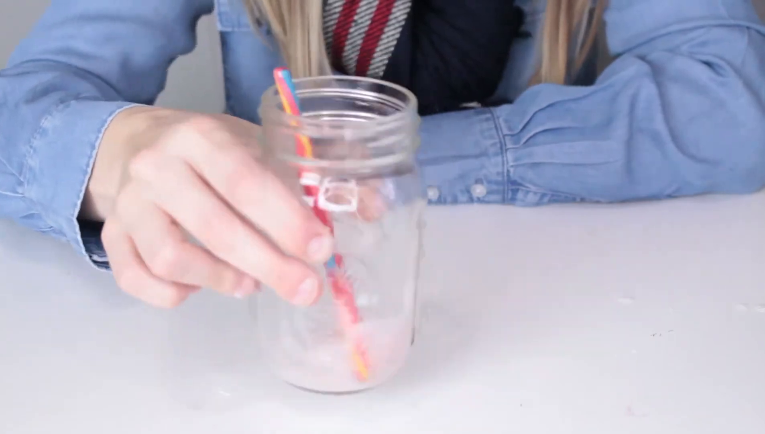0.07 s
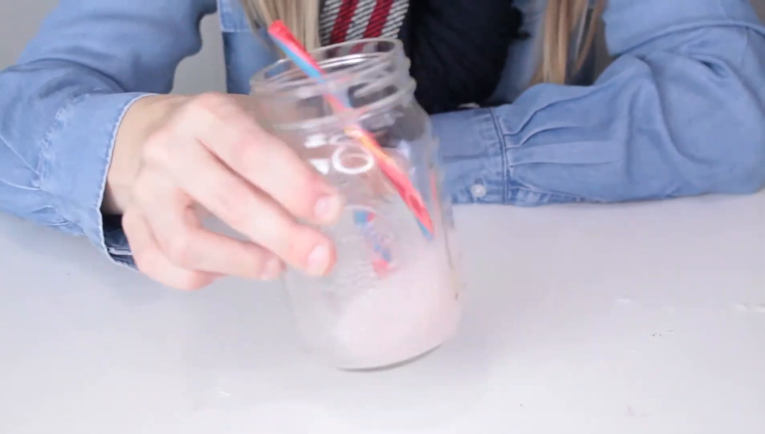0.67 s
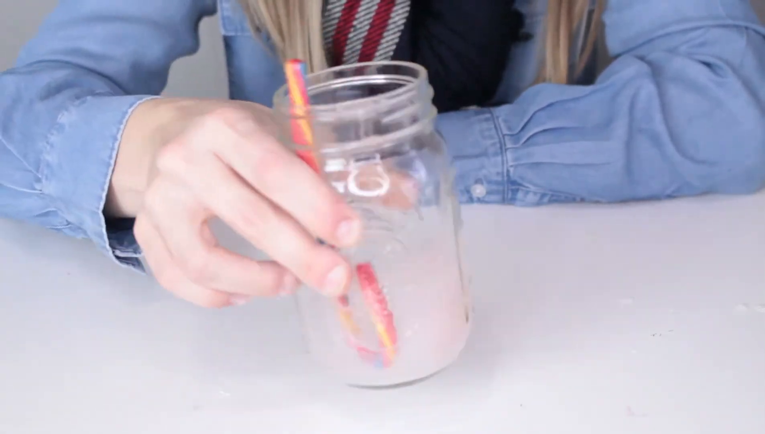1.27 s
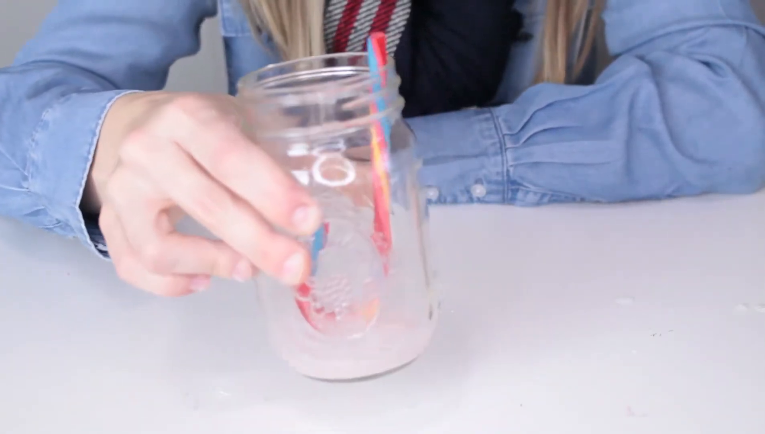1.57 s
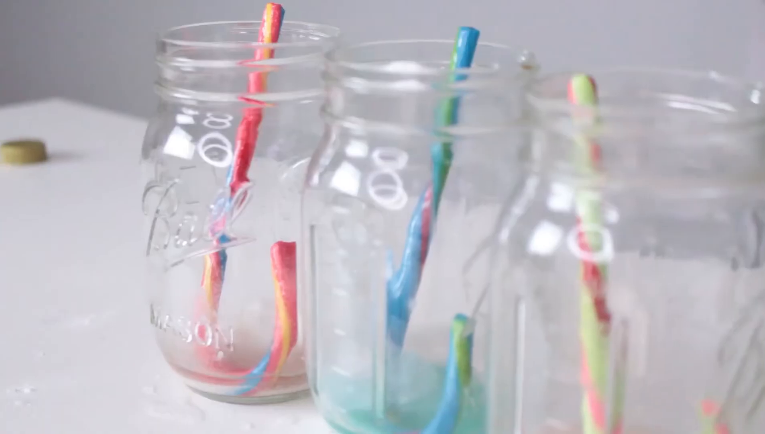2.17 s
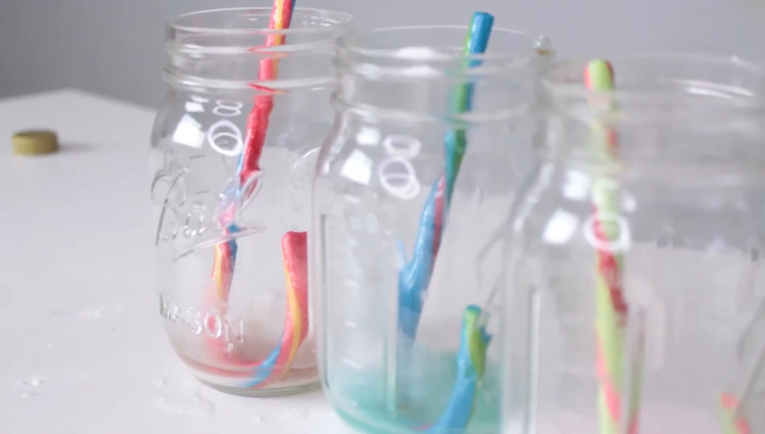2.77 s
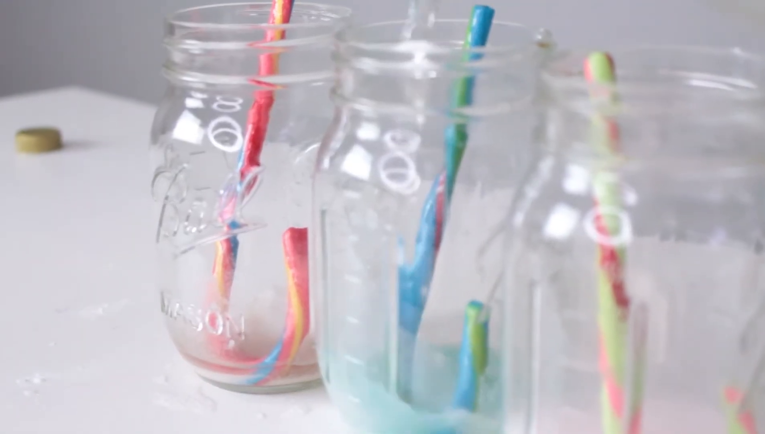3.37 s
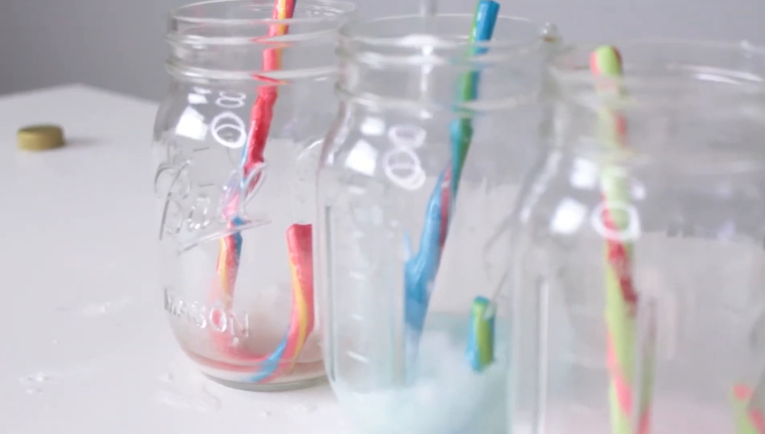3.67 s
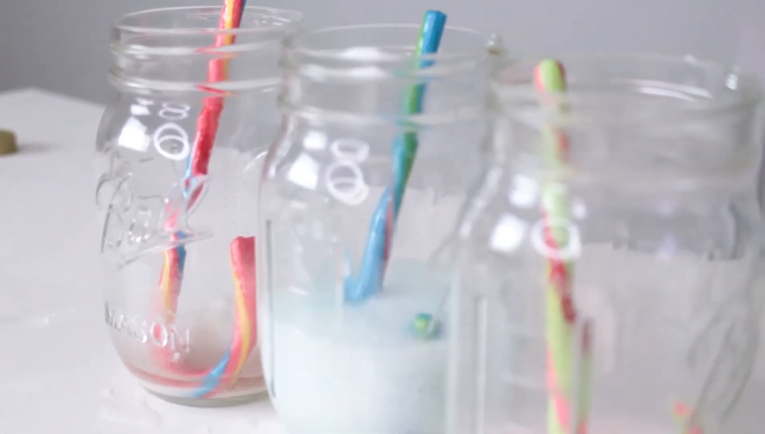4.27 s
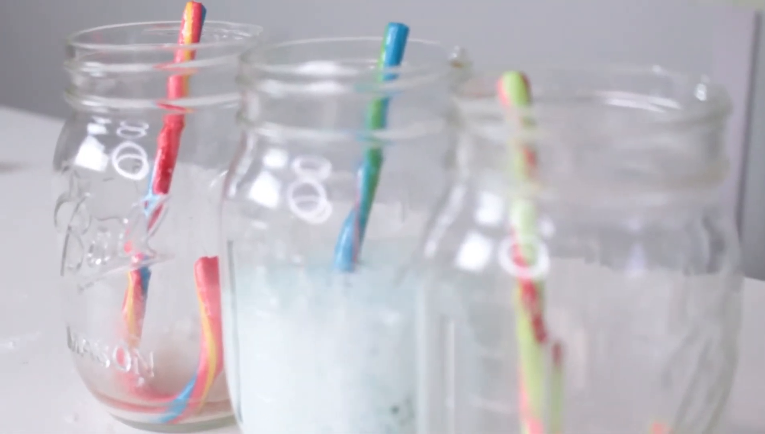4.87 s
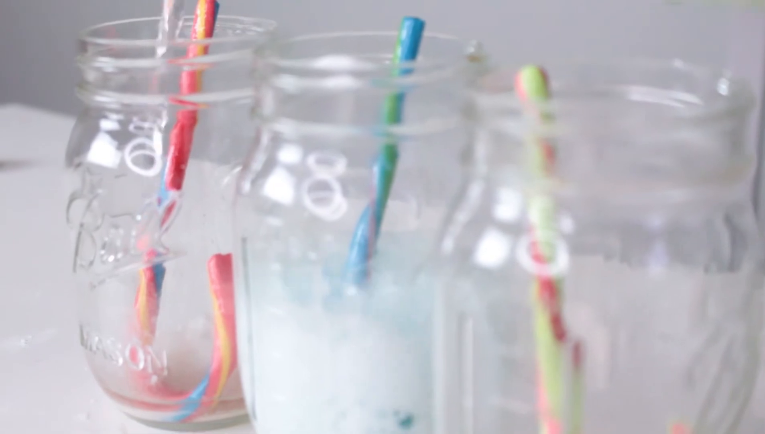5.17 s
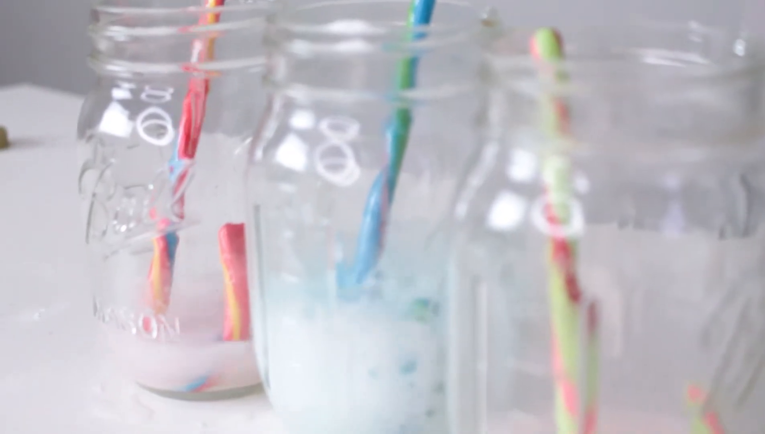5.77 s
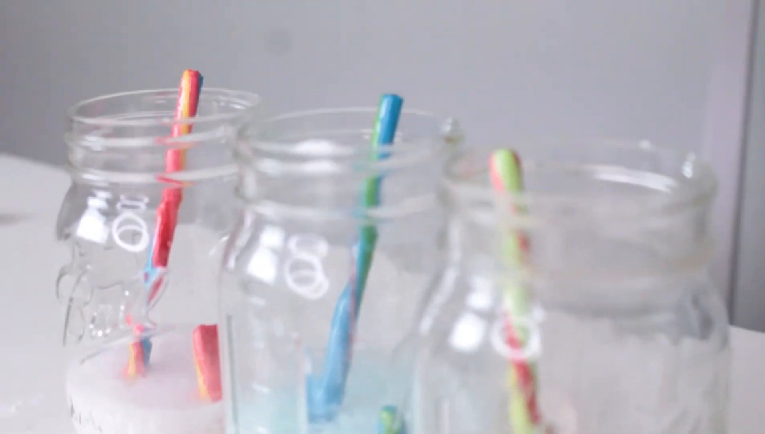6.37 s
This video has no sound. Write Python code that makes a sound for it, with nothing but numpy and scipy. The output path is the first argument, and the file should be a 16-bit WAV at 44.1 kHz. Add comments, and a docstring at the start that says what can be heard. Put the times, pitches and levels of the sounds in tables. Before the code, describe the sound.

Close to the microphone, a candy cane clinks, squeaks and scrapes against a glass jar as a little foam is swirled inside. The clinking stops and a soft, hollow fizz fades in. Liquid is poured briefly into a jar, and something thuds on the table as the pour ends. A second, louder pour spatters over the continuing hiss. The room is small and fairly live, with a quiet hum.

```python
"""Glassy clinks, close to the microphone: a candy cane knocks, squeaks and slides against the wall of a jar
swirled by hand over a little foam. Then the fizz of an already foaming jar fades in, and liquid is poured
twice into jars on a table; bursting bubbles hiss and sound the air in the jars. As the first pour ends,
something is set down on the table with a thud. Stereo, in a small, fairly live room with a quiet hum."""
import sys
import numpy as np
from scipy import signal
from scipy.fft import rfft, irfft, next_fast_len
from scipy.io import wavfile
from scipy.ndimage import uniform_filter1d

SR = 44100
rng = np.random.default_rng(int(sys.argv[2]) if len(sys.argv) > 2 else 0)


def waveform_to_disk(signal):
    """Save audio, clipped to [-1, 1], as 16-bit WAV at the path in sys.argv[1]."""
    frames = np.transpose(np.atleast_2d(signal))
    scaled = np.clip(frames, -1, 1) * 32767
    samples = np.round(scaled).astype(np.int16)
    wavfile.write(sys.argv[1], SR, samples)


N = 283563

# modes of the hand-held jar: (frequency [Hz], level [dB], t60 [s])
JAR_MODES = [(522, 3, 0.095), (1616, -3.5, 0.071), (1702, -2, 0.18), (2490, -9.5, 0.048),
             (2580, -30, 0.052), (2670, -8, 0.12), (2725, -3.5, 0.041), (5350, -7, 0.061), (5646, 3, 0.03),
             (5772, -4.5, 0.11), (8287, 0.5, 0.024), (8270, -9, 0.12)]


def amp(db):
    """Decibels to gain."""
    return 10 ** (np.asarray(db) / 20)


def unit(x):
    """Scale to rms 1."""
    return x / np.sqrt(np.mean(x ** 2) + 1e-20)


def along(points, hz):
    """Read (frequency [Hz], value) points on a log axis."""
    f, v = np.transpose(points)
    return np.interp(np.log(hz + 1), np.log(f + 1), v)


def filtered(x, response):
    """Pass x through a response given as a function of frequency."""
    n = x.shape[-1]
    m = next_fast_len(n + 8192)
    return irfft(rfft(x, m) * response(np.fft.rfftfreq(m, 1 / SR)), m)[..., :n]


def coloured(x, spectrum):
    """Shape x by (frequency [Hz], level [dB]) points, at rms 1."""
    return unit(filtered(x, lambda hz: amp(along(spectrum, hz))))


def low_cut(x, hz):
    """Small objects radiate little bass."""
    return signal.sosfilt(signal.butter(2, hz, "high", fs=SR, output="sos"), x)


def resonance(hz, centre, width):
    """Response of one damped resonance."""
    return 1j * hz * width / (centre ** 2 - hz ** 2 + 1j * hz * width)


def spread(pair, likeness):
    """Two unrelated signals become left and right with a given likeness."""
    turn = lambda hz: np.arccos(np.clip(along(likeness, hz), -1, 1)) / 2
    mid, side = filtered(pair, lambda hz: np.array([np.cos(turn(hz)), np.sin(turn(hz))]))
    return unit(np.array([mid + side, mid - side]))


def add(track, s, sound):
    """Mix a sound in at time s."""
    start = max(round(s * SR), 0)
    track[start:start + len(sound)] += sound[:N - start]


def swell(s, db, half):
    """A smooth rise and fall in gain around time s."""
    return amp(db) * np.exp(-((np.arange(N) / SR - s) / half) ** 2)


def ticks(rate, spread_db):
    """Random tiny impulses of uneven size."""
    hit = rng.random(N) < rate / SR
    return unit(hit * rng.standard_normal(N) * amp(spread_db * np.clip(rng.standard_normal(N), -2, 2)))


def ring(modes, force_db, t, jitter_hz):
    """Decaying modes, each driven by the blow at its frequency; contact chatter unsteadies the pitch."""
    hz, db, t60 = np.transpose(modes)[:, :, None]
    noise = rng.standard_normal((len(hz), len(t)))
    drift = unit(uniform_filter1d(noise, size=200, axis=1)) * jitter_hz * np.sqrt(hz / hz.mean())
    phase = rng.uniform(0, 2 * np.pi, hz.shape) + 2 * np.pi * np.cumsum(hz + drift, axis=1) / SR
    return np.sum(amp(db + force_db(hz) - 60 * t / t60) * np.sin(phase), axis=0)


def room_tone(level_db=-61):
    """The room hums quietly all around the microphone."""
    spectrum = [(20, -33), (38, -47), (52, 12.5), (75, 4), (140, 10.5), (250, 3.5), (500, -1.5), (1000, -3),
                (3000, -17), (7000, -6.5), (16000, -31.5)]  # background noise: (frequency [Hz], level [dB])
    likeness = [(50, 0.09), (130, 0.089), (400, 0.067), (4000, 0.15)]  # its width: (frequency [Hz], left-right likeness [0-1])
    return amp(level_db) * coloured(spread(rng.standard_normal((2, N)), likeness), spectrum)


def room(x):
    """The walls answer a few milliseconds later, the top treble and the bass dying first."""
    decay = [(150, 0.1), (600, 0.25), (2500, 0.4), (8000, 0.28), (16000, 0.096)]  # reverberation: (frequency [Hz], t60 [s])
    likeness = [(130, 0.17), (400, 0.7), (2000, 0.55), (8000, 0.042)]  # its width: (frequency [Hz], left-right likeness [0-1])
    hz, t, z = signal.stft(spread(rng.standard_normal((2, SR // 2)), likeness), SR, nperseg=256)
    tail = signal.istft(z * amp(-60 * t / along(decay, hz)[:, None]), SR, nperseg=256)[1]
    tail = np.pad(tail / np.linalg.norm(tail[0]), ((0, 0), (SR // 250, 0)))
    return signal.fftconvolve(x[None], tail, axes=1)[:, :N]


def drag(table_hz=148, width_hz=55):
    """The jar's foot drags and makes the table top drone faintly."""
    stroke = (1.33, -66, .33)  # one pull: (middle [s], level [dB], half length [s])
    drone = filtered(rng.standard_normal(N), lambda hz: resonance(hz, table_hz, width_hz) ** 2)
    return swell(*stroke) * unit(drone)


def swirling(slow_at_s=0.99, fade_db_per_s=11, settle_s=0.74):
    """Gain of the swirled foam's motion: steady, then settling lower as the hand slows."""
    return amp(-fade_db_per_s * np.clip(np.arange(N) / SR - slow_at_s, 0, settle_s))


def swirl(hum_db=-58, slosh_db=-6, air_hz=510, width_hz=42, attack=0.0015, t60=0.43):
    """The moving foam keeps the air in the jar humming, and each slosh swells the note."""
    sloshes = [(0.0, -52), (0.156, -33), (0.854, -35), (1.093, -39), (1.45, -46.5)]  # foam slops against the wall: (time [s], level [dB])
    level, t = amp(hum_db) * swirling() ** 2, np.arange(SR) / SR
    for s, db in sloshes:
        add(level, s, amp(db + slosh_db - 60 * t / t60) * (1 - np.exp(-t / attack)))
    note = filtered(ticks(rate=2800, spread_db=5.5), lambda hz: resonance(hz, air_hz, width_hz) ** 2)
    return level * unit(note)


def crackle(rate, spread_db):
    """Stereo ticks from bubbles bursting all over the foam."""
    likeness = [(130, 0.084), (400, 0.71), (1000, 0.54), (2000, 0.9), (4000, 0.81), (8000, 0.57),
                (13000, 0.29)]  # width of the foam: (frequency [Hz], left-right likeness [0-1])
    return spread(np.array([ticks(rate, spread_db), ticks(rate, spread_db)]), likeness)


def air_column(centre_hz, width_hz):
    """Fizz through one resonance of the air in a jar, whose centre can move over time."""
    hz, t, z = signal.stft(crackle(rate=7000, spread_db=1.5), SR, nperseg=2048)
    centre = np.interp(t, np.arange(N) / SR, centre_hz)
    gain = np.abs(resonance(hz[:, None], centre, width_hz)) ** 2
    return unit(signal.istft(z * gain, SR, nperseg=2048)[1][:, :N])


def bottle_note(age, depth, empty_hz=510, rise_hz=279, climb_s=1.07, width_hz=75, foam_damping=4,
                note_db=-1.5, muffle_db=-1.5, fade_db_per_s=2.0):
    """The lowest air resonance; climbing foam raises and muffles it, and deep foam widens it."""
    foam = depth * (1 - np.exp(-(age / climb_s) ** 2))
    note = air_column(empty_hz + rise_hz * foam, width_hz * (1 + foam_damping * depth))
    return amp(note_db + muffle_db * foam - fade_db_per_s * age) * note


def hollow(age, entry, ripening, depth, centre_hz, hollow_db=-1.5, width_hz=300, foam_damping=1.5):
    """The second air resonance grows as the foam ripens and swells as a wave of coarse bubbles bursts."""
    growth = 1 - np.exp(-(age / (0.48 * ripening)) ** 2)
    wave = swell(entry + ripening, db=1.5, half=0.3 * ripening)
    note = air_column(centre_hz, width_hz * (1 + foam_damping * depth))
    return amp(hollow_db) * (growth + wave) * note


def hiss(power, coarse_power, hiss_db=3.0, body_db=-1, split_hz=1700):
    """Bursting heard directly: all bubbles feed the treble, only coarse ones the body."""
    spectrum = [(100, -2.5), (260, 5), (700, 2.5), (1050, -1.5), (2000, -1.5), (3200, -3), (5800, 0),
                (8000, -1.5), (10000, -5), (13000, -12), (16000, -19)]  # bursting foam: (frequency [Hz], level [dB])
    noise = coloured(crackle(rate=24000, spread_db=2.0), spectrum)
    body = filtered(noise, lambda hz: 1 / (1 + (hz / split_hz) ** 4))
    return amp(hiss_db) * (np.sqrt(power) * (noise - body) + amp(body_db) * np.sqrt(coarse_power) * body)


def fizz(swirled_db=-52, swirled_coarse=0.56, upper_db=-1.5, thinning=0.9, coarsen_s=0.68):
    """Thousands of bubbles burst each second; the brighter a jar's foam, the less body it has."""
    # the foaming jars: (fizz comes in [s], fade-in [s], level [dB], fade [dB/s, negative grows],
    # foam depth [0-1], ripening [s], second air resonance [Hz], its glide [Hz/s], its level [dB],
    # brightness [dB])
    jars = [(2.02, 0.55, -51, 1, 0, 0.68, 1845, 18, -3, -0.5),
            (3.25, 0.77, -50.5, 0.78, 0.9, 2.1, 1762, 0, -0.5, 0),
            (5.17, 0.4, -52.5, -1, .3, 0.59, 1800, 337, 0, 5.5)]
    upper_air = [(3060, 530, 4), (4124, 1100, 8.5)]  # high air resonances: (frequency [Hz], width [Hz], level [dB])
    out, upper_power = np.zeros((2, N)), np.zeros(N)
    power = (amp(swirled_db) * swirling()) ** 2  # the swirled jar fizzes faintly throughout
    coarse_power = swirled_coarse * power
    for entry, fade_in, db, fade, depth, ripening, second_hz, glide, second_db, bright_db in jars:
        age = np.maximum(np.arange(N) / SR - entry, 0)  # time since this fizz came in
        level = amp(db - fade * age) * np.sin(np.pi / 2 * np.minimum(age / fade_in, 1)) ** 2
        coarse_share = 1 - np.exp(-(age / coarsen_s) ** 4)
        coarse = level * coarse_share * amp(-thinning * bright_db)
        out += coarse * bottle_note(age, depth)
        out += level * amp(second_db) * hollow(age, entry, ripening, depth, second_hz + glide * age)
        power += level ** 2
        coarse_power += coarse ** 2
        upper_power += (level * amp(bright_db)) ** 2
    overtones = lambda f: sum(amp(db) * np.abs(resonance(f, hz, bw)) ** 2 for hz, bw, db in upper_air)
    upper = unit(filtered(crackle(rate=12000, spread_db=1.5), overtones))
    out += amp(upper_db) * np.sqrt(upper_power) * upper
    return out + hiss(power, coarse_power)


def bubble(pitch_hz, rise_hz_per_s, cycles):
    """A bubble rings for some cycles; its pitch rises if it nears the surface."""
    t = np.arange(SR // 20) / SR
    periods = t * pitch_hz
    tone = np.sin(2 * np.pi * (periods + rise_hz_per_s * t ** 2 / 2))
    return tone * np.exp(-periods / cycles) * (1 - np.exp(-periods))


def spatter(level_db, pitch_hz, detune, cycles, count):
    """While the stream runs it beats bubbles of one size class into the foam."""
    streams = [(3.402, 3.953, -44.5), (5.299, 5.961, -37.5)]  # liquid running: (start [s], end [s], level [dB])
    out = np.zeros(N)
    for start, end, db in streams:
        for s, (size, strength) in zip(rng.uniform(start, end, count), rng.standard_normal((count, 2))):
            ping = bubble(pitch_hz * np.exp(detune * size), 0, cycles)
            add(out, s, amp(db + level_db + 2.3 * strength) * ping)
    return out


def pours():
    """Tiny bubbles sputter, fewer large ones gurgle."""
    sputter = spatter(level_db=-2, pitch_hz=5110, detune=0.31, cycles=9.5, count=170)
    gurgle = spatter(level_db=-9.5, pitch_hz=687, detune=0.348, cycles=5.2, count=50)
    return sputter + gurgle


def splashes(splash_db=1, spray_db=-7, scatter_s=0.0091, detune=0.188, cycles=10.3, rise=10000, count=14):
    """Each drop traps one bubble, then a spray of weaker ones; large pockets of gas plop."""
    drops = [(3.544, -32.5, 4370), (3.878, -35, 4580), (5.46, -36, 5540), (5.532, -31, 8400),
             (5.779, -34.5, 1930), (5.807, -27, 4490), (5.83, -35, 4500), (5.867, -31.5, 8650),
             (5.979, -39.5, 2880)]  # the loudest drops: (time [s], level [dB], bubble pitch [Hz])
    plops = [(1.434, -38, 880, 56000), (5.646, -37.5, 950, 4970)]  # large bubbles: (time [s], level [dB], starting pitch [Hz], rise [Hz/s])
    out = np.zeros(N)
    for s, db, pitch in drops:
        add(out, s, amp(db + splash_db) * bubble(pitch, rise, cycles))
        for delay, size, strength in rng.standard_normal((count, 3)):
            spray = bubble(pitch * np.exp(detune * size), rise, cycles)
            add(out, s + abs(delay) * scatter_s, amp(db + splash_db + spray_db + 2 * strength) * spray)
    for s, db, pitch, climb in plops:
        add(out, s, amp(db) * bubble(pitch, climb, cycles=8.5))
    return out


def thuds(thud_db=-4, tick_db=-6, tick_t60=0.049, attack=0.0013, rebound_s=0.021, loss_db=10):
    """Something lands on the table top; each blow rebounds once, and harder ones are brighter."""
    landings = [(3.356, -39, -7), (3.948, -31.5, 0), (3.9987, -20.5, 0), (4.04, -22, -12.5)]  # blows on the table: (time [s], level [dB], hardness [dB])
    modes = [(278, -1.5, 0.032), (372, -5.5, 0.063), (508, -4.5, 0.037), (594, 2.5, 0.036),
             (730, -5.5, 0.033), (2110, 5, 0.014)]  # modes of the table top: (frequency [Hz], level [dB], t60 [s])
    tap = [(100, 7), (500, -14), (2200, -2), (5000, -7), (16000, -27)]  # contact noise: (frequency [Hz], level [dB])
    out, t = np.zeros(N), np.arange(SR // 2) / SR
    blows = [(s + k * rebound_s, db - k * loss_db, hard) for s, db, hard in landings for k in range(2)]
    for s, db, hardness in blows:
        board = ring(modes, lambda hz: along([(800, 0), (2000, hardness)], hz), t, jitter_hz=11.0)
        tick = amp(tick_db + hardness - 60 * t / tick_t60) * coloured(rng.standard_normal(len(t)), tap)
        add(out, s, amp(db + thud_db) * (board + tick) * (1 - np.exp(-t / attack)))
    return low_cut(out, hz=169)


def slide(slide_db=4, damping_hz=45, grit=0.1):
    """Tiny slips of the scraping cane ring the jar, which the contact damps, and add a dry grit."""
    scrapes = [(1.07, -48.5, 0.048), (1.138, -57.5, 0.027), (1.284, -50, 0.03), (1.454, -51.5, 0.041),
               (1.675, -65, 0.11)]  # strokes round the wall: (middle [s], level [dB], half length [s])
    rub = [(510, -17), (1700, 1), (2700, 12), (5700, -7), (8300, 2), (13000, 0.5), (16000, -6)]  # colour of the friction: (frequency [Hz], level [dB])
    wall = lambda f: grit + sum(amp(db) * resonance(f, hz, damping_hz + np.log(1000) / (np.pi * t60))
                                for hz, db, t60 in JAR_MODES)
    pressure = amp(slide_db) * sum(swell(*scrape) for scrape in scrapes)
    slips = filtered(ticks(rate=2600, spread_db=2.5), wall)
    return pressure * coloured(low_cut(slips, hz=220), rub)


def squeaks(pitch_hz=2686, waver_hz=40, rough=0.063, attack=0.00037, t60=0.045):
    """The wet cane sticks and slips, locking onto the main wall mode for a moment."""
    catches = [(0.2953, -29.5, 0.028), (0.5685, -38.5, 0.027), (1.262, -41.5, 0.023),
               (1.384, -37.5, 0.0074), (1.795, -56, 0.026)]  # the wall sings: (time [s], level [dB], length [s])
    out, t = np.zeros(N), np.arange(SR // 5) / SR
    for s, db, length in catches:
        noise = rng.standard_normal((2, len(t)))
        drift, grip = unit(filtered(noise, lambda hz: 1 / (1 + (hz / 200) ** 2)))
        tone = np.sin(2 * np.pi * np.cumsum(pitch_hz + waver_hz * drift) / SR) * (1 + rough * grip)
        held = (1 - np.exp(-t / attack)) * amp(-60 * np.maximum(t - length, 0) / t60)
        add(out, s, amp(db) * held * tone)
    return out


def clinks(crack_db=-1, crack_t60=0.11, attack=0.00015):
    """Blows near the jar's base knock, blows near the rim ring the wall; hard ones are brighter."""
    # the cane meets the glass: (time [s], strength [dB], height [0 base - 1 rim], hardness [dB])
    blows = [(0.1552, -31.5, .38, -1.5), (0.179, -29.5, 0.73, -5), (0.2192, -37, 0.88, -9),
             (0.2963, -25.5, 0.42, -6), (0.4421, -34.5, .1, 10), (0.6878, -10.5, 1, 3.5),
             (0.7233, -22.5, 0.68, 3), (0.7792, -29, 0.17, 3), (0.8201, -25.5, .02, -3.5),
             (0.963, -43, 0.13, 2), (1.2227, -38.5, 0.71, 4), (1.461, -35, .03, -3),
             (1.4736, -36, 0.028, -4)]
    # how strongly a blow drives the jar: (frequency [Hz], at the base [dB], at the rim [dB])
    coupling = [(500, -10.5, -32.5), (1750, 2.5, -23), (2670, -1, 0), (5700, -14, -14), (8300, -6.5, -15)]
    crack_colour = [(40, -42), (150, -30), (350, 11), (750, 11), (1200, 8), (1700, 5), (2700, 0), (3800, 0),
                    (5700, -5), (8300, -1.5), (10000, -11), (16000, -15)]  # contact noise: (frequency [Hz], level [dB])
    treble_ramp = (2770, 5700)  # hardness lifts the treble: (starting at [Hz], fully from [Hz])
    out, t = np.zeros(N), np.arange(SR // 2) / SR
    bands, base, rim = np.transpose(coupling)
    for s, db, height, hardness in blows:
        drive = np.transpose([bands, base + height * (rim - base)])
        force = lambda hz: db + along(drive, hz) + hardness * np.interp(hz, treble_ramp, [0, 1])
        tone = ring(JAR_MODES, force, t, jitter_hz=31.5)
        chatter = filtered(rng.standard_normal(len(t)),
                           lambda hz: amp(force(hz) + along(crack_colour, hz)))
        crack = amp(crack_db - 60 * t / crack_t60) * chatter
        add(out, s, (tone + crack) * (1 - np.exp(-t / attack)))
    return low_cut(out, hz=230)


def scene(room_db=-5, fizz_room_db=-7, pan_db=0.3):
    """Jars and table close in front of the microphone, the small room around them."""
    near = clinks() + squeaks() + slide() + drag() + swirl() + splashes() + pours() + thuds()
    foam = fizz()
    hum = room_tone()
    echo = room(amp(room_db) * near + amp(fizz_room_db) * foam.mean(axis=0))
    return near * amp([[pan_db], [-pan_db]]) + foam + echo + hum


def record(dry, top_hz=15800):
    """The camera's microphone channel keeps nothing above its band limit."""
    return filtered(dry, lambda hz: hz < top_hz)


dry = scene()
out = record(dry)
waveform_to_disk(out)
```